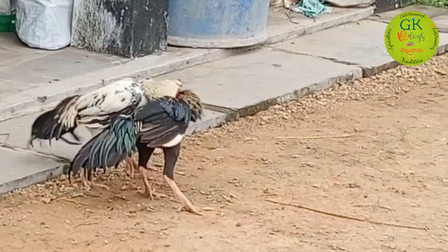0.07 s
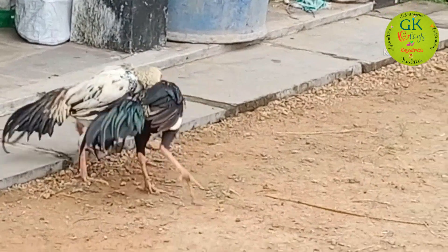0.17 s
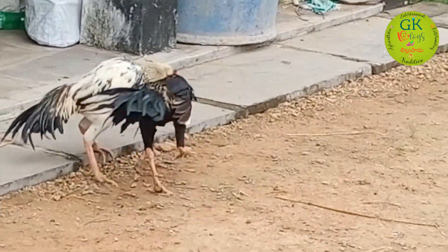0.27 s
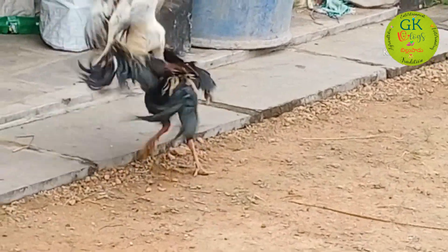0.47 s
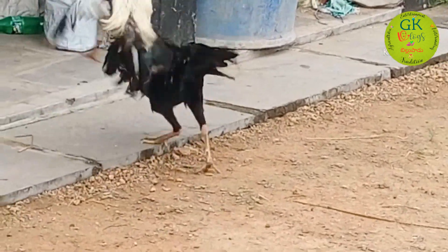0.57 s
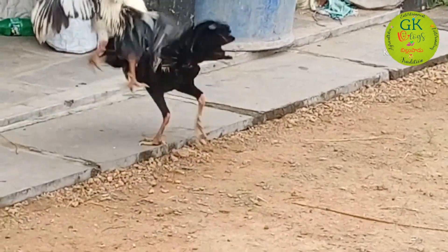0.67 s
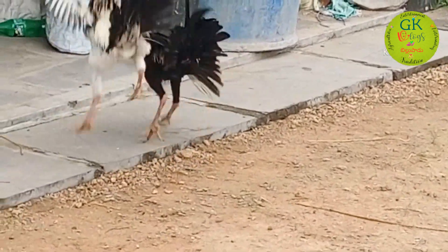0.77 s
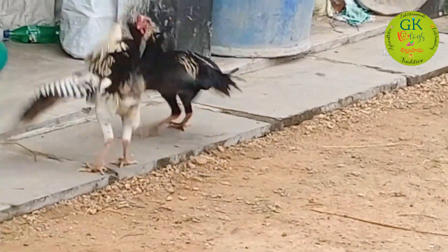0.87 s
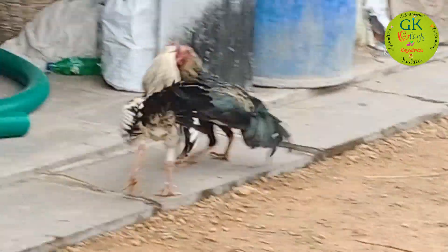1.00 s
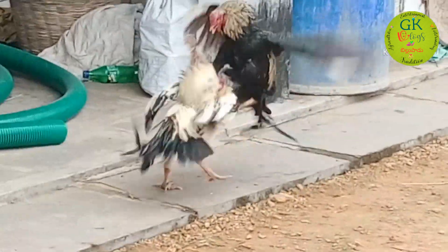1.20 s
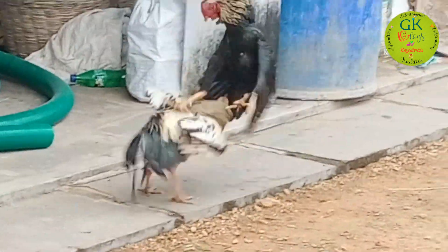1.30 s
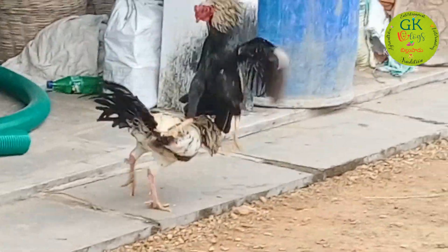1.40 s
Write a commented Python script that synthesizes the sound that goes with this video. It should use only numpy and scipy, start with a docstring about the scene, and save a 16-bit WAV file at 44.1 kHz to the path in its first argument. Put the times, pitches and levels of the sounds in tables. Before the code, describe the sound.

Two roosters flap and scuffle in a yard, slightly to the left. A soft thud and gritty foot scuffs come first. From about 0.5 to 0.7 seconds, wings clash loudly with snapping feathers. Claws click on paving near 0.8 seconds, and a softer flap follows at 0.9. Throughout, small birds chirp, distant fowl call faintly, and an insect buzzes on the right over a faint hiss and low drone.

```python
"""Two roosters leap at each other in a sandy yard: a loud clash of wings, then a softer flap on landing.
Wing strokes push air and rub feathers; quills snap, feather tips flutter in trains of low puffs,
and claws scuff the grit and strike the paving. Small birds whistle, fowl call hoarsely far off,
an insect buzzes on the right and something drones low in the distance. Walls and paving reflect."""
import sys
import numpy as np
from scipy import signal
from scipy.fft import rfft, irfft
from scipy.io import wavfile

SR = 44100
rng = np.random.default_rng(int(sys.argv[2]) if len(sys.argv) > 2 else 0)


def generate_wav(signal):
    """Clip the signal to [-1, 1] and save it as 16-bit WAV at the path in sys.argv[1]."""
    frames = np.transpose(np.atleast_2d(signal))
    scaled = np.clip(frames, -1, 1) * 32767
    pcm = np.round(scaled).astype(np.int16)
    wavfile.write(sys.argv[1], SR, pcm)


N = 63945
T = np.arange(N) / SR


def amp(db):
    """Decibels to gain."""
    return 10 ** (np.asarray(db) / 20)


def unit(x):
    """Scales to rms 1."""
    return x / np.sqrt(np.mean(x ** 2) + 1e-20)


def lookup(table, hz):
    """Interpolates on a log-frequency axis."""
    table_hz, values = np.transpose(table)
    return np.interp(np.log(hz + 1), np.log(table_hz + 1), values)


def colour(x, spectrum):
    """Filters by a table of (frequency [Hz], gain [dB])."""
    gain = amp(lookup(spectrum, np.fft.rfftfreq(2 * N, 1 / SR)))
    return irfft(rfft(x, 2 * N) * gain)[..., :N]


def noise(spectrum):
    """Coloured noise, rms 1."""
    return unit(colour(rng.standard_normal(N), spectrum))


def wander(hz):
    """Random drift with a Gaussian roll-off at hz, rms 1."""
    lowpass = np.exp(-(np.fft.rfftfreq(N, 1 / SR) / hz) ** 2)
    return unit(irfft(rfft(rng.standard_normal(N)) * lowpass, N))


def grains(spectrum, per_s, spread_db):
    """Dense coloured clicks of uneven size, rms 1."""
    size = amp(spread_db * np.minimum(rng.exponential(1, N), 4))
    clicks = size * rng.choice([-1, 1], N) * (rng.random(N) < per_s / SR)
    return unit(colour(clicks, spectrum))


def swell(peak_s, rise_s, fall_s):
    """Gaussian rise, exponential decay."""
    return np.exp(-(np.minimum(T - peak_s, 0) / rise_s) ** 2 - np.maximum(T - peak_s, 0) / fall_s)


def swell_pair(events):
    """Two envelopes, one per level column; swells add in power."""
    return [np.sqrt(sum((amp(row[column]) * swell(*row[:3])) ** 2 for row in events))
            for column in (3, 4)]


def gate(start_s, length_s, rise_s, fall_s):
    """Attack, hold, release."""
    attack = np.clip((T - start_s) / rise_s, 0, 1)
    release = np.clip((start_s + length_s - T) / fall_s, 0, 1)
    return np.sin(np.pi / 2 * attack * release)


# Yard decay (frequency [Hz], T60 [s])
YARD_T60 = [(150, 0.051), (450, 0.1), (1000, 0.38), (4500, 0.38), (12000, 0.22)]

def yard(x, wet_db):
    """Direct sound plus a short stereo tail scattered by walls and paving."""
    hz, age_s, bands = signal.stft(rng.standard_normal((3, SR // 2)), SR, nperseg=256)
    decay = amp(-60 * age_s / lookup(YARD_T60, hz)[:, None])
    tails = signal.istft(bands * decay, SR, nperseg=256)[1]
    stereo = tails[0] + 0.37 * tails[1:]
    stereo /= np.linalg.norm(stereo[0])
    return x + amp(wet_db) * signal.fftconvolve(x[None], stereo, axes=1)[:, :N]


# Early reflections (delay [s], gain [dB])
REFLECTIONS = [(0.0042, -18), (0.0107, -21), (0.0214, -16.5)]

def echoes(x):
    """Direct sound plus first bounces off paving, barrel and wall."""
    return x + sum(amp(db) * np.pad(x, (round(delay_s * SR), 0))[:N] for delay_s, db in REFLECTIONS)


# Yard hiss (frequency [Hz], density [dB])
HISS_SPECTRUM = [(100, -32), (400, -6.5), (800, -6.5), (1500, -5), (2600, -24), (3500, -21), (4200, -2),
                 (5100, -9.5), (6500, 5.5), (8000, -6), (10000, 5.5), (11500, -56), (16000, -13.5)]
# Far drone (frequency [Hz], density [dB])
DRONE_SPECTRUM = [(20, -37), (60, -19), (95, -7.5), (120, 1.5), (150, -10.5), (220, -16.5), (400, -32.5),
                  (1500, -71)]
# Far bird chorus (frequency [Hz], density [dB])
CHORUS_SPECTRUM = [(3600, -45), (4200, -17), (4400, -2), (4520, 20.5), (4700, 7), (4950, -24), (5400, -57)]

def background():
    """Hiss, a low drone and a blur of distant birds, each wavering in level."""
    hiss_gain = amp(-65 + wander(hz=19))
    centre = noise(HISS_SPECTRUM)
    sides = amp(-8.5) * np.array([noise(HISS_SPECTRUM), noise(HISS_SPECTRUM)])
    drone = amp(-67.5 + 1.2 * wander(hz=15)) * noise(DRONE_SPECTRUM)
    chorus = amp(-62.5 + 1.5 * wander(hz=40)) * noise(CHORUS_SPECTRUM)
    return hiss_gain * (centre + sides) + drone + chorus


# Insect resonance (frequency [Hz], density [dB])
INSECT_SPECTRUM = [(6500, -42), (8000, -30), (8700, -4), (9250, -1.5), (9850, -5.5), (10400, -25),
                   (10900, -58)]

def insect(pulse_hz=131.5, depth=0.42, level_db=-52.5, left_db=-23.5):
    """Rapid pulses of a high, noisy resonance, off to the right."""
    rate_hz = pulse_hz * (1 + 0.0069 * wander(hz=7.1))
    pulses = 1 + depth * np.cos(2 * np.pi * np.cumsum(rate_hz) / SR)
    right = unit(noise(INSECT_SPECTRUM) * pulses)
    left = unit(right + 1.6 * noise(INSECT_SPECTRUM) * pulses)
    return amp(level_db) * np.array([amp(left_db) * left, right])


# Far fowl (start [s], length [s], pitch [Hz], harmonic 2 [dB], harmonic 3 [dB], harmonic 4 [dB])
FOWL_CALLS = [(0.0, 0.035, 537.5, -83, -61.5, -64), (0.298, 0.04, 529.7, -59, -51.5, -57.5),
              (0.352, 0.097, 533.5, -67, -61.5, -63.5), (0.658, 0.165, 557.7, -71, -57.5, -85),
              (1.08, 0.09, 558, -82, -65, -90), (1.418, 0.058, 528.4, -70.5, -69.5, -62)]

def fowl(start_s, length_s, hz, *harmonics_db, sag_hz_per_s=66, fade_db_per_s=44, roughness=0.63):
    """A hoarse far call that sags in pitch as it fades."""
    age_s = np.maximum(T - start_s, 0)
    pitch_hz = (hz - sag_hz_per_s * age_s) * (1 + 0.0192 * wander(hz=194))
    phase = 2 * np.pi * np.cumsum(pitch_hz) / SR
    voice = sum(amp(db) * np.sin(k * phase) * (1 + roughness * wander(hz=68.5))
                for k, db in enumerate(harmonics_db, 2))
    return amp(-fade_db_per_s * age_s) * voice * gate(start_s, length_s, rise_s=0.0048, fall_s=0.028)


# Small birds (start [s], length [s], first pitch [Hz], middle pitch [Hz], last pitch [Hz], level [dB])
BIRD_CHIRPS = [(0.173, 0.022, 4450, 4900, 4970, -50), (0.194, 0.016, 5030, 4945, 4960, -40),
               (0.208, 0.022, 4750, 4590, 4160, -44), (0.241, 0.0407, 3654, 3554, 3290, -58),
               (0.278, 0.021, 4450, 4760, 4420, -47), (0.363, 0.017, 3980, 4255, 4000, -45.5),
               (0.57, 0.034, 4900, 4710, 4320, -42.5), (0.658, 0.0153, 4300, 4530, 3940, -43),
               (0.888, 0.03, 4720, 4655, 4700, -49.5), (0.945, 0.03, 4664, 4553, 4370, -46),
               (0.991, 0.11, 4453, 4585, 4390, -58.5), (1.082, 0.063, 4497, 4460, 4200, -56.5),
               (1.239, 0.016, 4200, 4355, 3660, -55.5), (1.269, 0.01, 5800, 5620, 5360, -46.5),
               (1.288, 0.0041, 5200, 5070, 4960, -62), (1.295, 0.02, 4400, 4710, 4350, -48),
               (1.321, .028, 5770, 5350, 4800, -58), (1.348, .026, 4990, 5540, 5450, -64),
               (1.358, 0.025, 4685, 4740, 4620, -48.5), (1.444, 0.026, 4150, 4410, 4300, -46.5),
               (1.187, 0.11, 6760, 6800, 6680, -66), (1.301, 0.068, 7500, 7240, 7430, -57.5),
               (1.345, .1, 7230, 7000, 6900, -56), (1.434, 0.041, 7000, 6710, 6750, -48.5)]

def chirp(start_s, length_s, first_hz, middle_hz, last_hz, db):
    """A wavering whistle that curves through three pitches."""
    progress = np.clip((T - start_s) / length_s, 0, 1)
    parabola = np.polyfit([0, .5, 1], [first_hz, middle_hz, last_hz], 2)
    pitch_hz = np.polyval(parabola, progress) * (1 + 0.01186 * wander(hz=255))
    envelope = np.sqrt(2 * np.abs(np.sin(np.pi * progress)))
    shimmer = 1 + 0.2 * wander(hz=120)
    return amp(db) * envelope * shimmer * np.sin(2 * np.pi * np.cumsum(pitch_hz) / SR)


# Foot scuffs (peak time [s], rise [s], fall [s], grit level [dB], sand level [dB])
FOOT_SCUFFS = [(0.021, 0.085, 0.054, -53.5, -60.5), (0.282, 0.021, 0.033, -57, -54),
               (0.321, 0.017, 0.013, -49.5, -51), (0.373, 0.034, 0.044, -49.5, -59),
               (0.45, 0.048, 0.027, -56.5, -62), (0.72, 0.028, 0.042, -57.5, -62.5),
               (0.841, 0.0048, 0.057, -51.5, -84), (0.904, 0.036, 0.045, -58.5, -57),
               (1.035, 0.0082, 0.11, -61, -69), (1.34, 0.043, 0.046, -60.5, -68),
               (1.445, 0.024, 0.022, -63, -64)]
# Crisp grit (frequency [Hz], density [dB])
GRIT_SPECTRUM = [(500, -56), (1400, -9.5), (2700, -30), (3400, -4.5), (4500, 7.5), (5300, 0.5), (6500, 1),
                 (7400, -2.5), (8500, -4.5), (11500, -27.5), (14000, -15), (16000, -23)]
# Dull sand (frequency [Hz], density [dB])
SAND_SPECTRUM = [(250, -64), (750, -11), (1100, -5.5), (1600, -0.5), (2250, 4), (2800, -1.5), (3500, 3),
                 (5000, 1), (10000, -47)]
# Footfalls (peak time [s], rise [s], fall [s], level [dB])
FOOTFALLS = [(0.004, 0.009, 0.005, -38), (0.268, 0.012, 0.0092, -61)]
# Footfall thud (frequency [Hz], density [dB])
THUD_SPECTRUM = [(20, -27), (45, -1), (85, -3.5), (160, -24), (300, -28.5), (2000, -57)]

def feet():
    """Claws drag crisp grit and dull sand; weight lands with a soft thud."""
    grit_gain, sand_gain = swell_pair(FOOT_SCUFFS)
    thud_gain = sum(amp(db) * swell(*timing) for *timing, db in FOOTFALLS)
    grit = grains(GRIT_SPECTRUM, per_s=4700, spread_db=1)
    return grit_gain * grit + sand_gain * noise(SAND_SPECTRUM) + thud_gain * noise(THUD_SPECTRUM)


# Quills snapping (peak time [s], rise [s], fall [s], burst level [dB], ring [Hz], ring level [dB])
QUILL_SNAPS = [(0.4784, .0003, 0.0012, -39, 6900, -38), (0.5008, 0.002, 0.0025, -30.5, 6620, -28),
               (0.5115, 0.0007, 0.00062, -36, 6600, -48), (0.5276, 0.0039, 0.0023, -33, 6760, -34.5),
               (0.5407, .001, 0.0013, -50, 6600, -41), (0.596, .001, 0.0013, -51, 6450, -46)]
# Quill burst (frequency [Hz], density [dB])
QUILL_SPECTRUM = [(800, -30), (2600, -19), (3300, 10.5), (4500, 3.5), (5400, -46), (7200, -10),
                  (8500, -6.5), (11500, -15.5), (14500, -2), (16000, -14)]
# Claws on paving (peak time [s], rise [s], fall [s], burst level [dB], ring [Hz], ring level [dB])
CLAW_STRIKES = [(0.636, .002, .003, -51, 6900, -52), (0.8321, .0002, .0011, -34.5, 7050, -36),
                (0.847, .0015, .0009, -42, 6250, -38), (0.8617, .0004, .001, -49, 6700, -46),
                (0.957, .002, .002, -52, 7000, -45)]
# Claw burst (frequency [Hz], density [dB])
CLAW_SPECTRUM = [(800, -30), (2700, -41), (3200, 7), (4500, 8), (5400, -11), (7200, 12), (8500, -19),
                 (11000, -16), (16000, -16)]

def crack(spectrum, peak_s, rise_s, fall_s, burst_db, ring_hz, ring_db, ring_width_hz=370):
    """A quill snaps or a claw strikes: a noise burst with a narrow treble ring."""
    pitch_hz = ring_hz + ring_width_hz * wander(hz=936)
    ring = np.sqrt(2) * np.sin(2 * np.pi * np.cumsum(pitch_hz) / SR)
    return swell(peak_s, rise_s, fall_s) * (amp(burst_db) * noise(spectrum) + amp(ring_db) * ring)


# Tip flutters (start [s], length [s], puff rate [Hz], level [dB], colour [Hz], hollow re body [dB])
TIP_FLUTTERS = [(0.461, 0.12, 165, -54, 223, -3), (0.584, 0.058, 110, -38, 125, -8),
                (0.62, 0.077, 120, -47, 132, -14), (0.914, 0.089, 180, -50.5, 203.3, -7.5)]
# Puff body (frequency / colour [ratio], gain [dB])
BODY_SHAPE = [(.25, -34), (.55, 2), (.8, 9), (1.15, 17), (1.7, 3.5), (2.6, -29), (4, -5), (8, -41),
              (20, -75)]
# Cupped-wing overtone (frequency / colour [ratio], gain [dB])
HOLLOW_SHAPE = [(1, -37), (1.7, -30), (2.25, 1), (2.7, -14), (4, -16), (10, -59)]

def flutter(start_s, length_s, rate_hz, db, colour_hz, hollow_db, jitter=0.2):
    """Feather tips shed an uneven train of low puffs, hollow where the wing is cupped."""
    cycles = np.cumsum(rate_hz * (1 + jitter * wander(hz=150.1))) / SR
    puffs = np.diff(np.floor(cycles), prepend=0) * (1 + 0.34 * wander(hz=98))
    puffs -= puffs.mean()
    body, hollow = [unit(colour(puffs, [(colour_hz * ratio, gain_db) for ratio, gain_db in shape]))
                    for shape in (BODY_SHAPE, HOLLOW_SHAPE)]
    envelope = gate(start_s, length_s, rise_s=0.0098, fall_s=0.036)
    return amp(db) * envelope * (body + amp(hollow_db) * hollow)


# Wing strokes (peak time [s], rise [s], fall [s], air level [dB], rustle level [dB])
WING_STROKES = [(0.484, 0.0079, 0.019, -41, -44.5), (0.506, 0.0064, 0.046, -35, -40.5),
                (0.545, 0.028, 0.019, -37.5, -37.5), (0.598, 0.0068, 0.036, -41, -45),
                (0.67, 0.03, 0.022, -53, -50.5), (0.911, 0.013, .015, -57, -55),
                (0.941, 0.023, 0.061, -54, -57)]
# Rush of air (frequency [Hz], density [dB])
AIR_SPECTRUM = [(71, -22), (120, -10), (238, 5), (325, -15.5), (487, -1.5), (612, -9), (739, -1),
                (1050, -6.5), (1370, -4), (2260, -15), (3000, -14), (3900, -41), (6600, -120)]
# Feather rustle (frequency [Hz], density [dB])
RUSTLE_SPECTRUM = [(1500, -31), (2500, -22), (3700, -1.5), (4700, -3.5), (5300, -11), (6000, -6.5),
                   (6650, -2), (7400, -9), (8200, -14.5), (11300, -23.5), (14500, -16.5), (16000, -14.5)]

def wings():
    """Each stroke pushes a rush of air and rubs the feathers over one another."""
    air_gain, rustle_gain = swell_pair(WING_STROKES)
    air = grains(AIR_SPECTRUM, per_s=6000, spread_db=2)
    rustle = grains(RUSTLE_SPECTRUM, per_s=6000, spread_db=3)
    return air_gain * air + rustle_gain * rustle


# Stereo balance (frequency [Hz], left minus right [dB])
STEREO_BALANCE = [(60, 0.5), (130, 3), (290, 4.5), (640, 4), (1410, 6.5), (3100, 3.5), (4600, 4.5),
                  (6800, -3.5), (15000, -7.5)]

def scene():
    """Fight, birds and background lean left, their top treble right; the insect sits right."""
    quills = sum(crack(QUILL_SPECTRUM, *row) for row in QUILL_SNAPS)
    claws = sum(crack(CLAW_SPECTRUM, *row) for row in CLAW_STRIKES)
    mix = yard(echoes(wings() + feet()) + quills + claws, wet_db=-7.5)
    mix += yard(sum(flutter(*row) for row in TIP_FLUTTERS), wet_db=-15)
    mix += yard(sum(chirp(*row) for row in BIRD_CHIRPS), wet_db=-6)
    mix += yard(sum(fowl(*row) for row in FOWL_CALLS), wet_db=-4)
    mix += background()
    left = colour(mix[0], [(hz, db / 2) for hz, db in STEREO_BALANCE])
    right = colour(mix[1], [(hz, -db / 2) for hz, db in STEREO_BALANCE])
    return np.array([left, right]) + insect()


def record(dry):
    """Steep low-pass at 15.8 kHz."""
    lowpass = signal.firwin(511, 15800, window=("kaiser", 9), fs=SR)
    return signal.oaconvolve(dry, lowpass[None], "same")


dry = scene()
out = record(dry)
generate_wav(out)
```